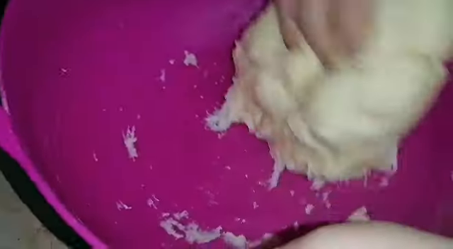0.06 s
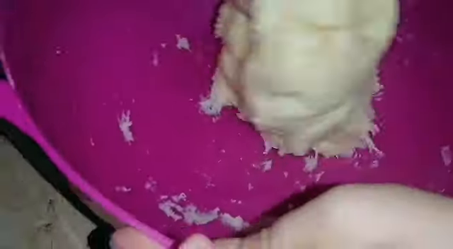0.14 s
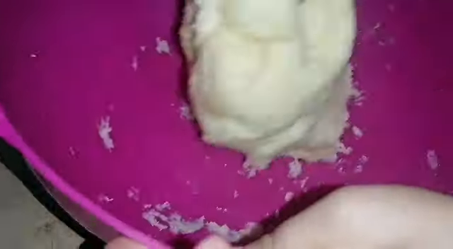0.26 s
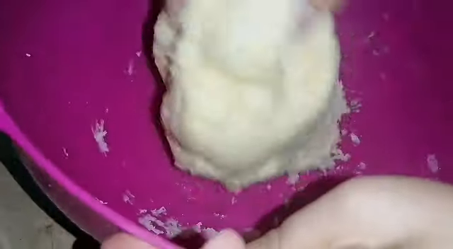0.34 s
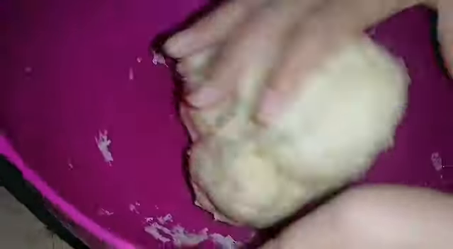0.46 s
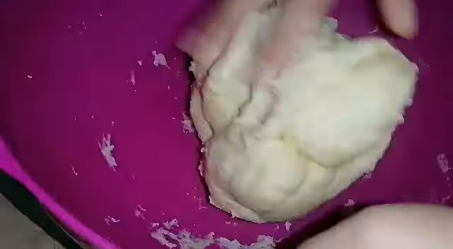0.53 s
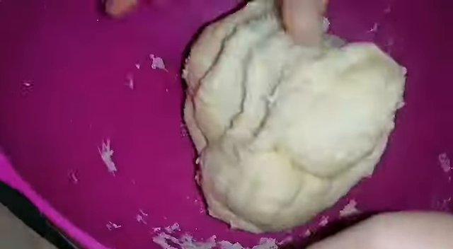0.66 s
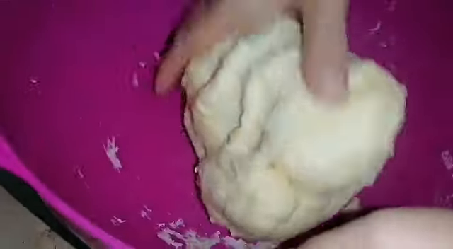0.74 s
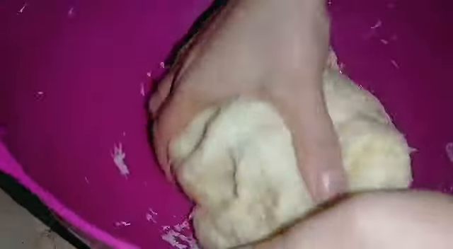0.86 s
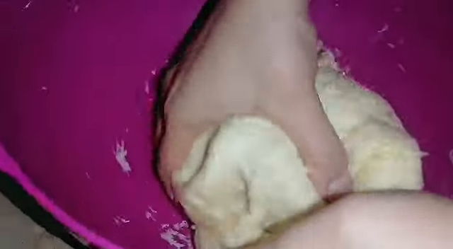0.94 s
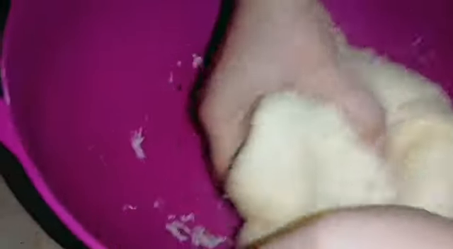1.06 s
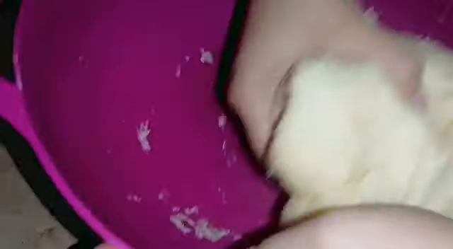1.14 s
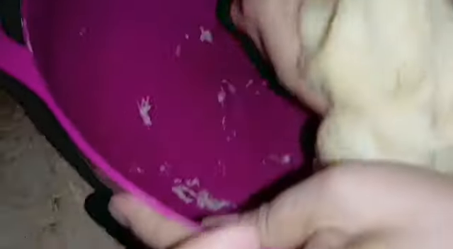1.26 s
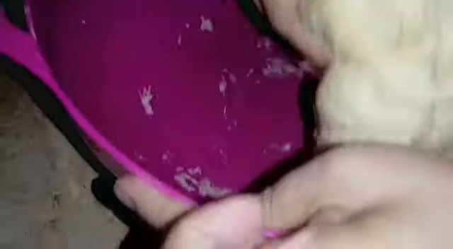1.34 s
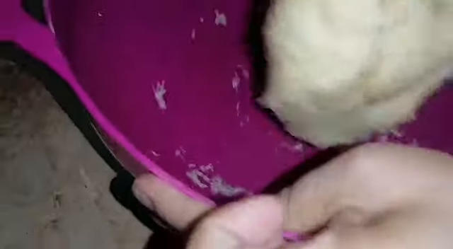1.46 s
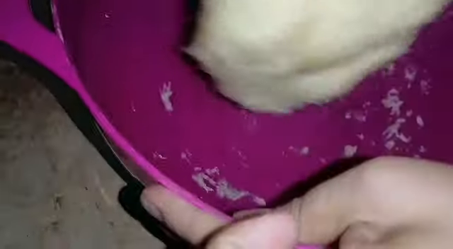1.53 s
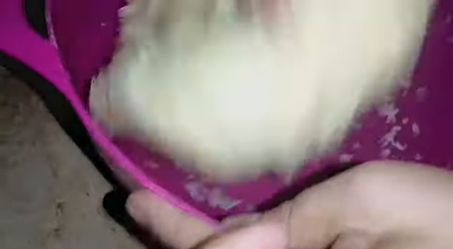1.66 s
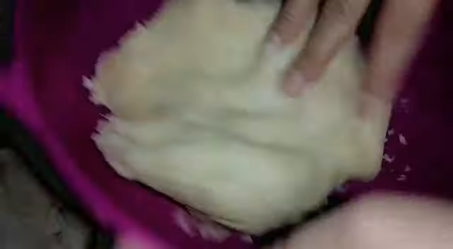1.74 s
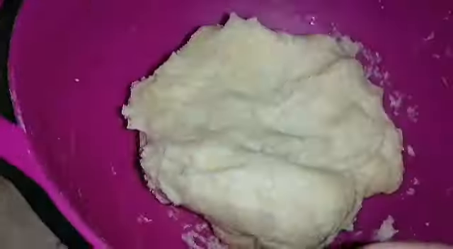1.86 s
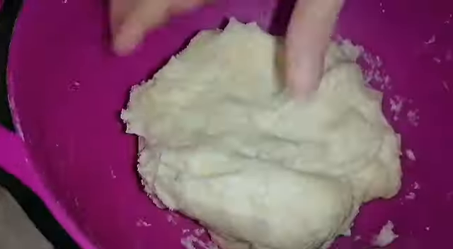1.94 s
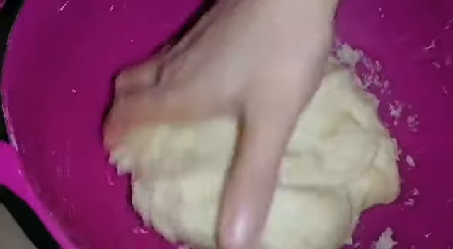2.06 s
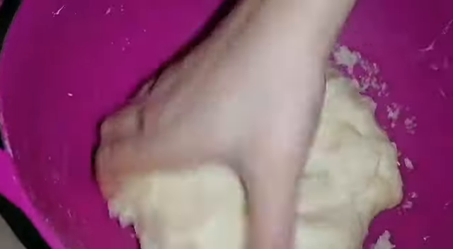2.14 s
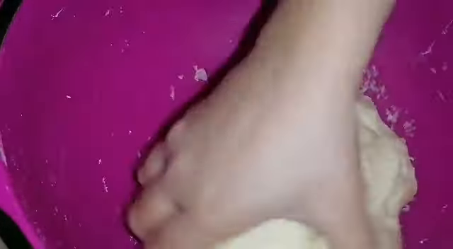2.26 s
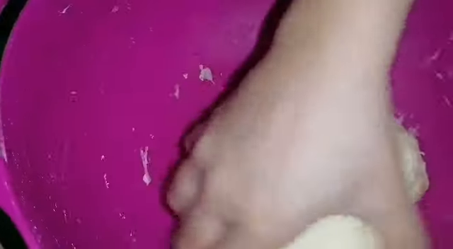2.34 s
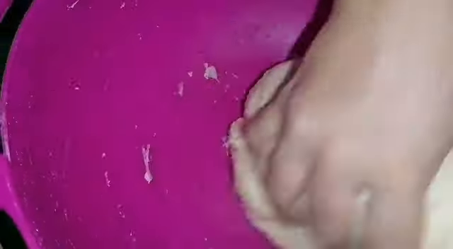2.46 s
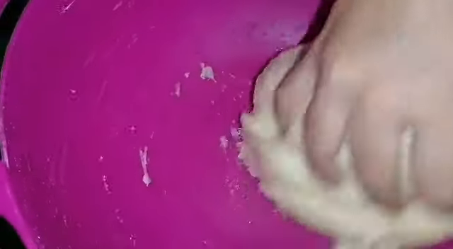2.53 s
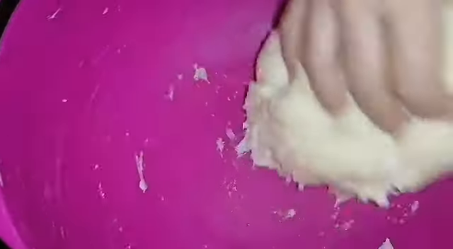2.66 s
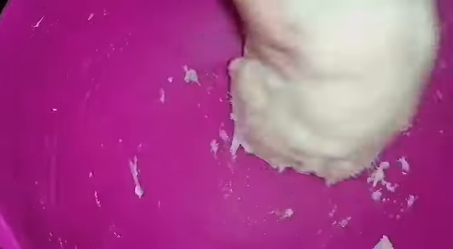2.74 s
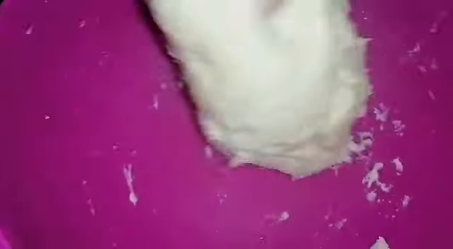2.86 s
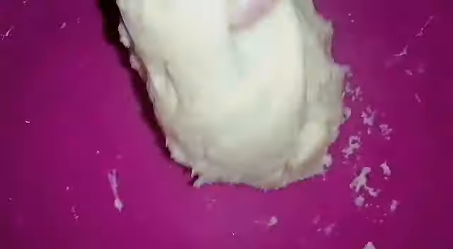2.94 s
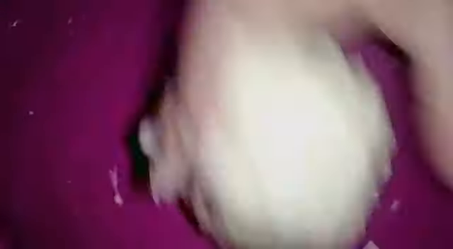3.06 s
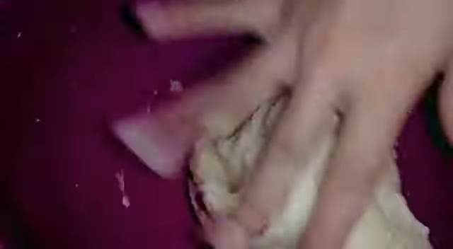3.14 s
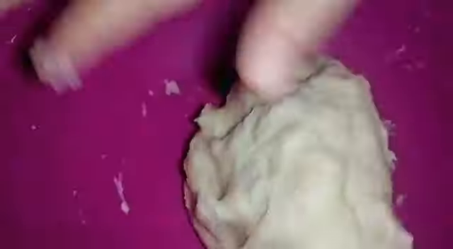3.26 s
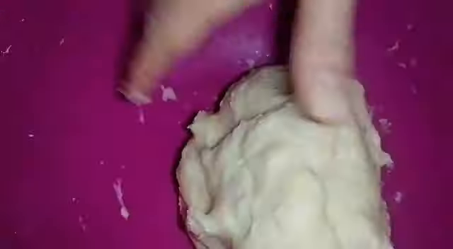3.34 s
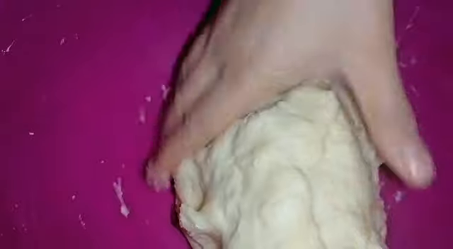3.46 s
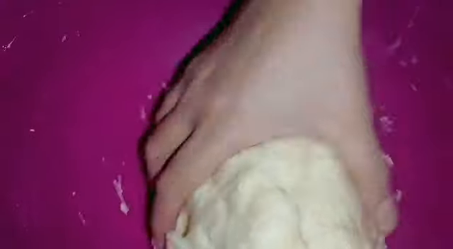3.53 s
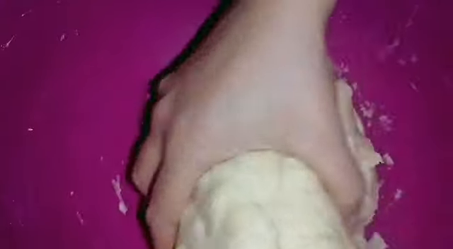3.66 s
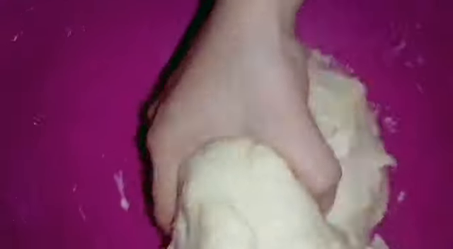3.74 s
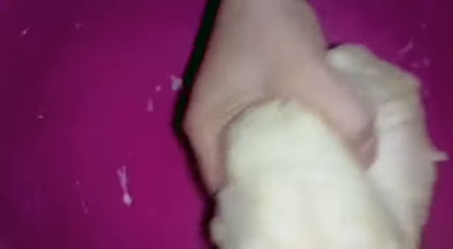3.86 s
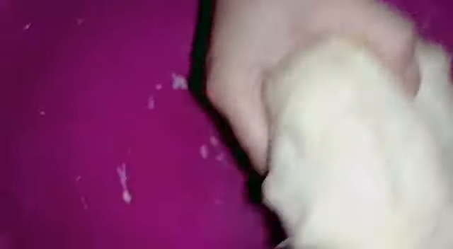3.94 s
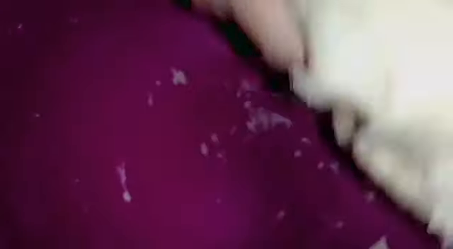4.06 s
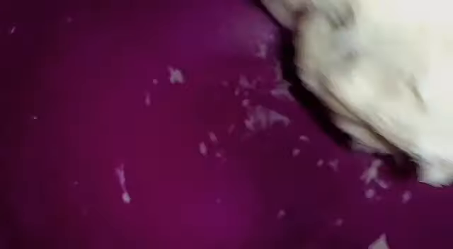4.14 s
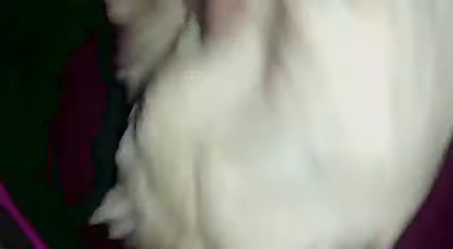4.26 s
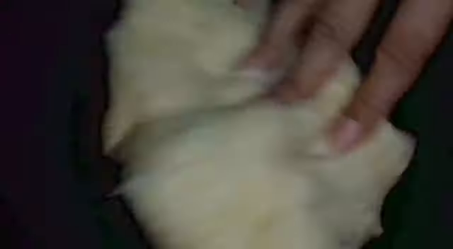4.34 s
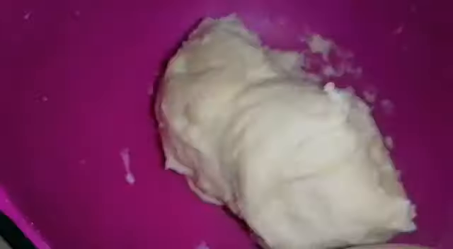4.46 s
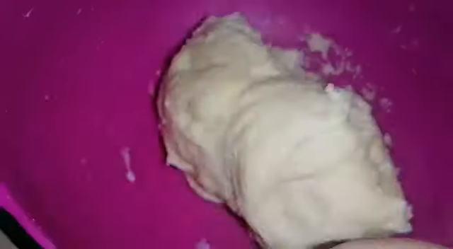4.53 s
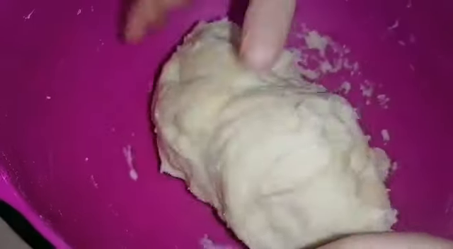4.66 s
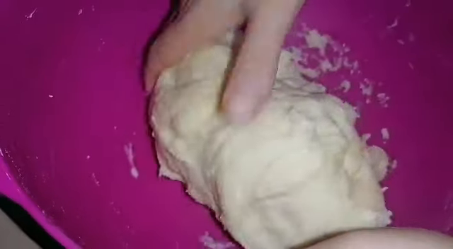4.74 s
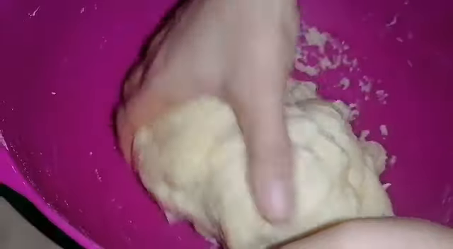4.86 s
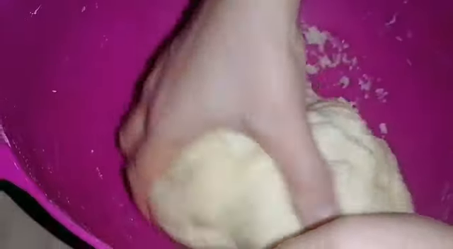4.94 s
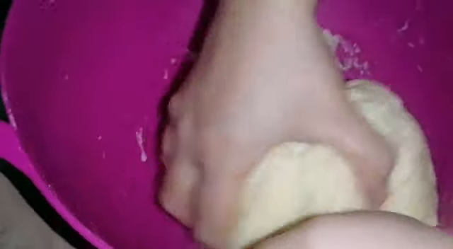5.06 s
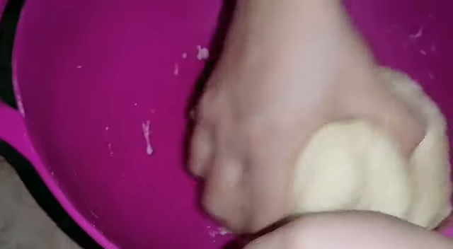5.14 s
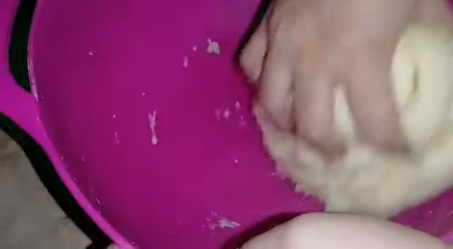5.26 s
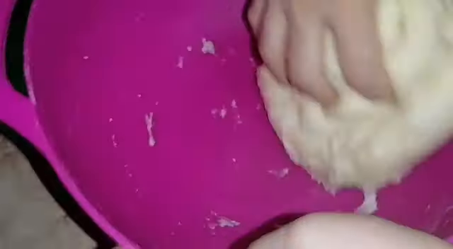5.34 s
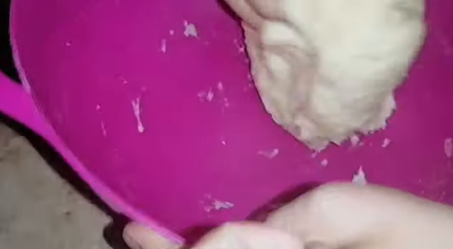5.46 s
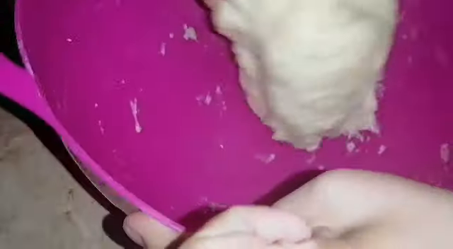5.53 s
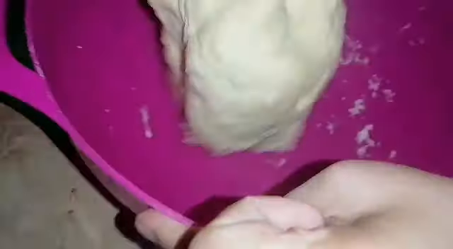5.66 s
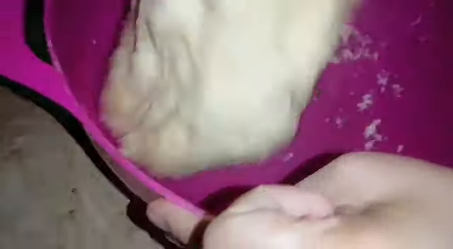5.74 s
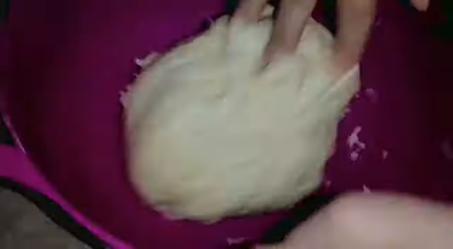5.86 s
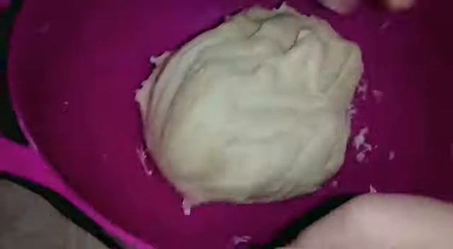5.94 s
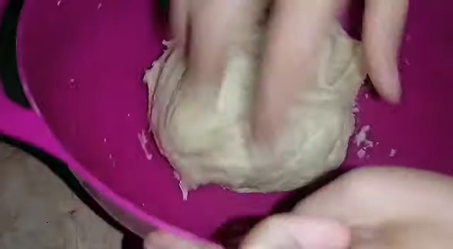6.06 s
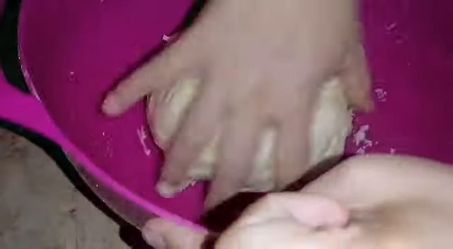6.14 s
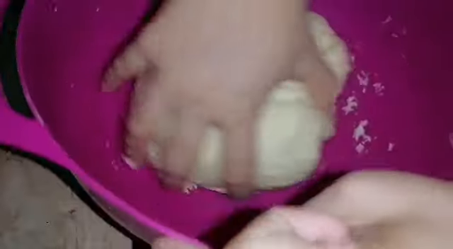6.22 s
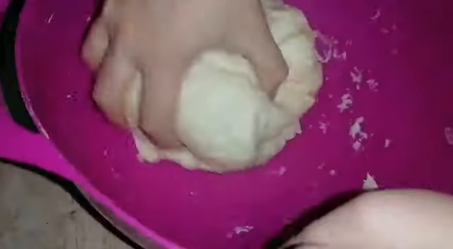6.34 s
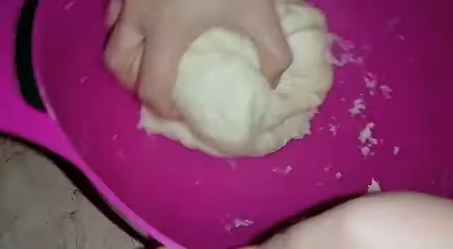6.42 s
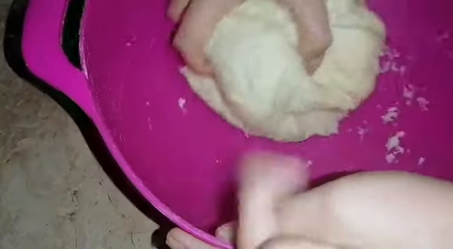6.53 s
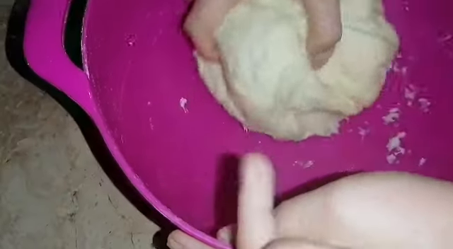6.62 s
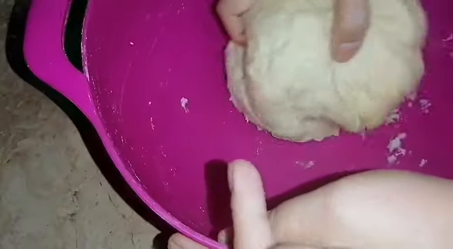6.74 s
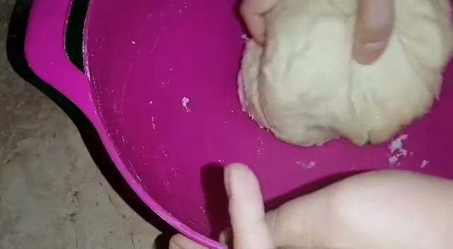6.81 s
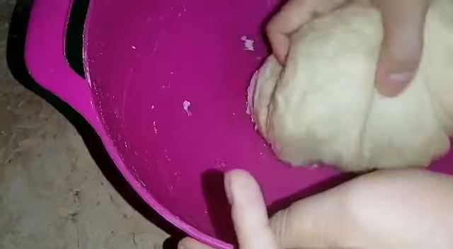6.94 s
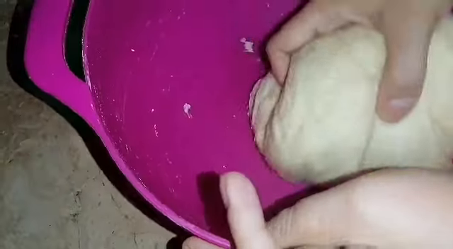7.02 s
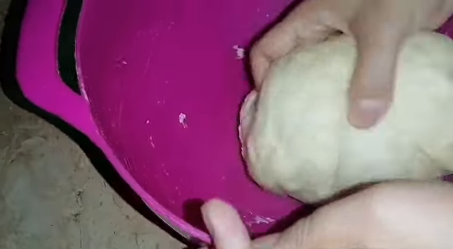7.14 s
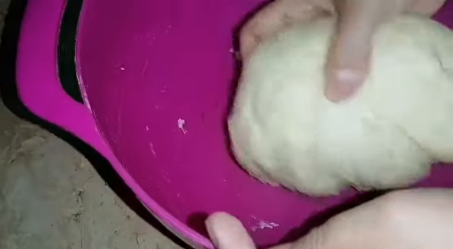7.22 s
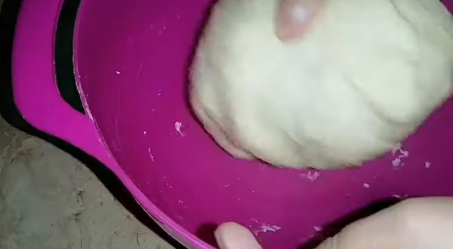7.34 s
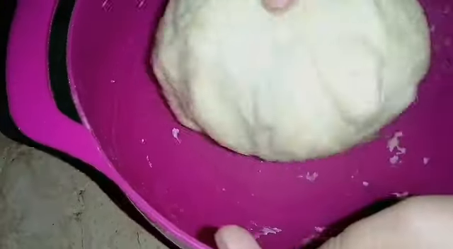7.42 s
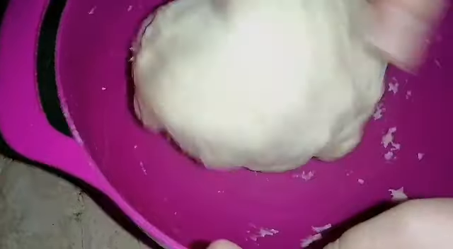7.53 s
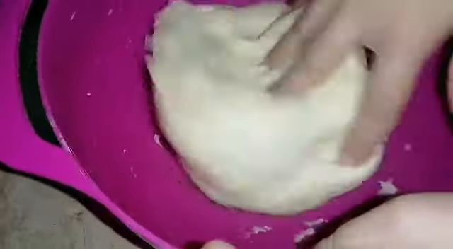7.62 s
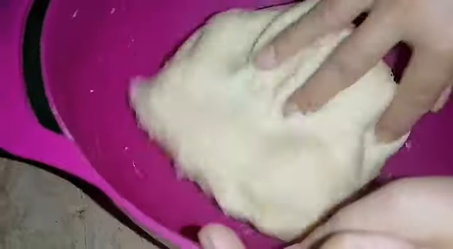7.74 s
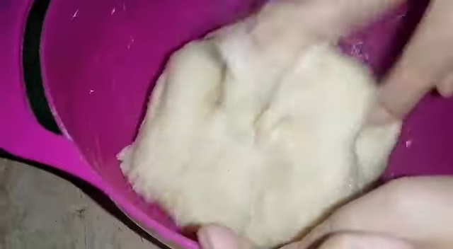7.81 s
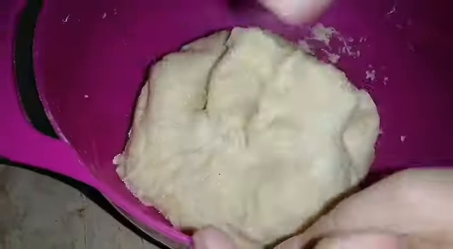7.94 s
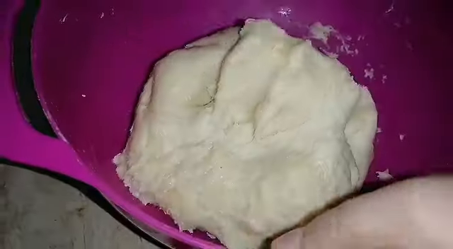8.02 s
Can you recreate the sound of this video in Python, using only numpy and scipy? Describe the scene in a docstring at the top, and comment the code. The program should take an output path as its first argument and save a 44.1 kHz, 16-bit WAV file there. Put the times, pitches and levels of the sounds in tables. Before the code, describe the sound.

Sticky dough hisses and crackles as it is folded, dropping back into a thin plastic bowl with soft slaps in a quiet kitchen.

```python
"""Soft dough rubs and peels under folding hands, and drops back into a thin plastic bowl.
Friction and snapping sticky threads make a hiss; impacts slap and set the bowl's modes booming briefly.
Trapped air pops, and a fingertip squeaks on the plastic by stick-slip. Behind them are the echo,
room tone and faint whistle of a quiet kitchen. Two spaced microphone ports are close by."""
import sys
import numpy as np
from scipy import signal
from scipy.fft import rfft, irfft, next_fast_len
from scipy.io import wavfile
from scipy.ndimage import uniform_filter1d

SR = 44100
rng = np.random.default_rng(int(sys.argv[2]) if len(sys.argv) > 2 else 0)


def to_wav(s):
    """Save 16-bit WAV."""
    ch = np.atleast_2d(s).T  # columns
    pcm = np.round(np.clip(ch, -1, 1) * 32767)  # PCM
    wavfile.write(sys.argv[1], SR, pcm.astype(np.int16))


N = 356328

# strokes of rubbing and peeling: start_s, length_s, bright_db, swell_db, dull_over_bright_db
STROKES = [(0.0, 0.12, -51.5, 3, -7.5), (0.154, 0.06, -47.5, 0, -0.5), (0.241, 0.057, -57, -2.5, -1),
           (0.348, 0.13, -62, -5, 6), (0.564, 0.038, -54.5, -9, 5.5), (0.824, 0.098, -54.5, 1.5, 2.5),
           (0.887, 0.23, -63, 13.5, 1), (1.181, 0.21, -51.5, -0.5, -0.5), (1.415, 0.11, -62.5, 0, 2),
           (1.553, 0.072, -53, -5, 0.5), (1.776, 0.054, -49.5, 3, -3), (1.879, 0.068, -48, -9.5, 3.5),
           (2.199, 0.16, -54.5, -5, -3.5), (2.423, 0.3, -58, -3.5, -6), (2.81, 0.075, -67, -4, -12),
           (2.975, 0.11, -60, -5.5, 5), (3.161, 0.032, -63, 9.5, 2.5), (3.554, 0.051, -78.5, 10.5, 7),
           (3.698, 0.45, -62, -7.5, 2), (3.855, 0.25, -71.5, 7, -9), (4.286, 0.071, -66.5, 9.5, 2.5),
           (4.461, 0.084, -56, -2.5, -10), (4.866, 0.12, -74.5, -2, 5), (5.037, 0.11, -58.5, -5, -3),
           (5.149, 0.26, -53.5, -14, -3.5), (5.47, 0.017, -69, 2.5, 2), (5.68, 0.037, -63, -6, 5.5),
           (5.769, 0.048, -58.5, 1, 3), (5.9, 0.053, -53, 1.5, -3.5), (5.988, 0.11, -53, 1, -3.5),
           (6.3, 0.072, -54.5, 3, 1.5), (6.4, 0.1, -53.5, 4.5, -9), (6.521, 0.14, -44, -3.5, -4),
           (6.85, 0.21, -76, 10.5, -3), (7.181, 0.043, -54, 3.5, 1.5), (7.329, 0.023, -64, 3, 2),
           (7.603, .15, -66, 10, 1.5), (8.01, 0.038, -62.5, -7, 4)]
GRIP_DB_PER_S, LET_GO_DB_PER_S = 359, 273
RESTING_BRIGHT_DB, RESTING_DULL_DB = -76, -73   # hands lying on the dough between strokes
CRACKLE_PER_S, CRACKLE_DB = 250, -9   # sticky threads snapping, against the friction noise
# spectra of the bright and the dull hiss: frequency_hz, density_db
BRIGHT_SPECTRUM = [(2060, -77), (3500, -13.5), (3870, -7), (4430, -5.5), (6990, 3), (8420, -6), (9960, -15),
                   (11400, -21.5), (13900, -28), (14300, -26), (15000, -19.5), (15500, -82)]
DULL_SPECTRUM = [(350, -51), (600, -54), (766, -5), (899, -2), (1250, -3.5), (1650, 0.5), (2000, 4),
                 (3200, 3), (3750, -7), (4500, -7), (5850, -4.5), (9900, -120)]
# gain of the topmost treble of the bright hiss: time_s, gain_db
SIZZLE = [(0.0, 6.5), (0.2, 6.5), (0.8, 10), (0.95, -3), (1.28, 8.5), (1.86, 0), (2.2, -4), (2.54, 17),
          (2.9, 13.5), (3.2, -4.5), (3.9, 7), (4.5, -2.5), (5.2, -4.5), (5.9, 8), (6.1, -2.5), (6.4, -24),
          (6.64, 2.5), (7.2, 5), (7.74, -9), (8.08, -3)]
SIZZLE_FROM_HZ, SIZZLE_FLICKER_DB = 10000, 1.8
# upper wall modes that rubbing excites: frequency_hz
RUBBED_MODES_HZ = [874, 1113, 1490, 1682, 2004, 2283, 2600, 2862, 3290]

# dough or fingers strike the bowl:
# start_s, bright_slap_db, dull_slap_db, low_modes_db, middle_modes_db, hollow_ring_db, lean_left_db
BLOWS = [(0.098, -29.5, -43, -80, -64, -69, 0), (0.54, -33, -34.5, -40.5, -54, -55, -7),
         (0.809, -30, -34.5, -50, -58, -55, 12), (0.825, -30.5, -37.5, -57, -62, -48, 10),
         (0.9065, -24.5, -21.5, -31, -36, -26.5, 11.5), (1.8571, -34, -30, -70, -37.5, -41.5, 8),
         (1.8653, -25.5, -31, -34.5, -44.5, -31.5, 8.5), (1.8705, -25, -29, -75, -44, -48, 0),
         (1.9524, -76, -53, -45.5, -46.5, -49, 3), (2.143, -54, -48, -54, -56, -62, 2),
         (2.562, -42, -67, -67, -61, -70, -9), (3.19, -47, -52, -56, -70, -65, 6),
         (3.2035, -50, -43, -65, -64, -57, 8), (3.2063, -41.5, -32.5, -36.5, -32.5, -25, 9),
         (4.4768, -68, -54, -46, -80, -55, 28), (4.5114, -21, -26.5, -40.5, -46.5, -31, 12.5),
         (4.839, -55.5, -57.5, -60.5, -72, -63, 10), (5.022, -54, -50, -83, -78, -77, 0),
         (5.662, -37, -31.5, -39.5, -41, -42, 9), (5.9203, -38, -41.5, -57, -51, -64, -2),
         (5.9997, -59, -39, -74, -48.5, -44, 7), (6.0082, -53, -62, -45, -66, -44.5, 18),
         (6.271, -63, -49, -72, -73, -59, 1), (6.33, -47, -38.5, -46.5, -46, -61, 2),
         (6.336, -44, -44, -56.5, -41.5, -42, -1), (6.354, -56, -63, -48.5, -52, -46, 8),
         (7.9779, -36.5, -27, -36, -34, -32, 5), (7.9882, -51, -40, -38, -49, -34.5, 17)]
TAIL_S, TAIL_AT_DB, TAIL_SHORTENING = 0.0088, -45.5, 0.35   # decay time at that level; dB lost per dB
CRACK_GAIN, CRACK_S = 0.78, 0.00095
# normal modes of the bowl: frequency_hz, level_db, t60_s
BOWL_MODES = [(53.5, 0, 0.16), (100, 3, 0.15), (143.3, 9.5, 0.34), (197.3, 3.5, 0.098), (221.5, 2.5, 0.24),
              (293, 5.5, 0.063), (373, 4, 0.032), (398.2, -1.5, 0.12), (552.2, -14.5, 0.19),
              (600, -1.5, 0.017), (586.4, -11.5, 0.15), (659, -24.5, 0.18), (848, -16.5, 0.045),
              (960, -9, 0.019)]
MIDDLE_FROM_HZ, HOLLOW_FROM_HZ = 260, 440
THUMP_BELOW_HZ, THUMP_DB = 170, -11.5   # blows drive the low modes less than handling does
DEEP_BELOW_HZ, DEEP_DB = 120, 9   # the deepest modes regain most of that
# murmur of the wall under the hands: time_s, level_db
MURMUR = [(0.0, -52.5), (0.18, -59.5), (0.26, -55.5), (0.5, -52), (0.72, -52.5), (0.895, -46), (0.93, -45),
          (1.25, -59), (2.0, -52.5), (2.6, -55.5), (3.6, -56.5), (4.5, -54.5), (4.8, -65.5), (5.9, -61.5),
          (6.4, -60.5), (6.57, -62), (6.65, -57.5), (8.08, -61)]

# air pockets burst: start_s, level_db, pitch_hz, t60_s, rasp_fraction
POPS = [(0.004, -49, 853, 0.2, 0), (0.025, -39, 540, 0.11, 0.49), (0.085, -51.5, 910, 0.19, 0.26),
        (1.822, -31.5, 936, 0.041, 0.4), (2.602, -37.5, 547, 0.023, 0.24), (2.65, -44, 874, 0.041, 0.06),
        (3.189, -43, 950, 0.034, 0.5), (3.674, -49.5, 1015, 0.29, 0.61), (4.137, -50, 904, 0.18, 1),
        (4.163, -44, 887, 0.076, 0.6), (4.478, -33, 591, 0.11, 0.3), (4.488, -23, 844, 0.044, 0.36),
        (6.645, -32.5, 930, 0.056, 0.4)]
# a fingertip slides on the plastic: middle_s, nominal_pitch_hz, level_db, tone_to_flutter_ratio
SQUEAKS = [(7.088, 1318, -61, 1.46), (7.306, 1297, -60.5, 0.66)]
# overtones of the squeak: pitch_ratio, level_db
SQUEAK_OVERTONES = [(2, -17)]
SQUEAK_FADE_DB_PER_S, SQUEAK_SAG_HZ_PER_S = 117, 320   # either side of the middle

KITCHEN_T60_S, KITCHEN_DB, WALL_CUT_HZ = 0.35, -16, 4200
# swells of a thin whistle in the room: middle_s, level_db
WHISTLES = [(3.35, -79), (3.5, -79), (6.2, -75), (7.415, -69), (7.85, -72)]
WHISTLE_HZ, WHISTLE_T60_S, WHISTLE_FADE_DB_PER_S = 4110, 0.014, 200
# spectrum of the room tone: frequency_hz, density_db
ROOM_SPECTRUM = [(12, -31), (20, 27), (64, -18), (140, 4.5), (393, 2), (519, -14), (881, -2.5), (3080, -27),
                 (4430, -14.5), (7110, -73), (10200, -24), (12100, -137), (15500, -81)]
ROOM_TONE_DB = -61.5

# likeness of the sound at the two ports: frequency_hz, correlation_ratio
COHERENCE = [(60, 0.84), (200, 0.99), (400, 0.29), (800, 0.03), (1300, 0.0016)]
# the microphone turns: time_s, left_over_right_db
BALANCE = [(0.0, 0), (4.4, -0.5), (4.7, -6), (5.9, -3.5), (6.3, -7), (8.08, -11)]
PORT_HZ, PORT_T60_S, PORT_DB, PORT_LAG_S = 7080, .008, -30, .0004
DUCK_BELOW_HZ, DUCK_WINDOW_S = 1400, .04
DUCK_FROM_DB, DUCK_SLOPE = 8.5, 3.4   # threshold of treble over bass; dB taken for each dB more
BASS_CUT_HZ, TREBLE_CUT_HZ = 224, 15900


def rubbing():
    """Sliding friction radiates a bright and a dull hiss, which flicker as the contact patch changes."""
    bright_gain, dull_gain = stroke_envelopes()
    grip_db = 1.28 * drift(13.8) + 1.3 * drift(45)
    fine = sticky_friction(np.geomspace(4300, 9500, 13), t60_cycles=70, patchy_db=4, ring_db=-4)
    bright = colour(fine, BRIGHT_SPECTRUM)
    body = signal.sosfilt(signal.butter(4, SIZZLE_FROM_HZ, "low", fs=SR, output="sos"), bright)
    top = signal.sosfilt(signal.butter(4, SIZZLE_FROM_HZ, "high", fs=SR, output="sos"), bright)
    top *= from_db(in_time(SIZZLE) + SIZZLE_FLICKER_DB * drift(47))
    bright = (body + top) * bright_gain * from_db(grip_db + 0.29 * drift(49))
    coarse = sticky_friction(RUBBED_MODES_HZ, t60_cycles=25, patchy_db=6.2, ring_db=-5.5)
    dull = colour(coarse, DULL_SPECTRUM) * dull_gain
    return bright + dull * from_db(grip_db + 0.87 * drift(6.4) + 0.95 * drift(60))


def stroke_envelopes():
    """Incoherent sources add in power: bright and dull gains as strokes grip, swell or sink, and let go."""
    t = np.arange(0, N + 64, 64) / SR
    power = np.ones((2, len(t))) * from_db([[2 * RESTING_BRIGHT_DB], [2 * RESTING_DULL_DB]])
    for start_s, length_s, bright_db, swell_db, dull_db in STROKES:
        age = t - start_s
        db = bright_db + swell_db * np.clip(age / length_s, 0, 1)
        db -= GRIP_DB_PER_S * np.maximum(-age, 0) + LET_GO_DB_PER_S * np.maximum(age - length_s, 0)
        power += from_db(2 * (db + np.array([[0], [dull_db]])))
    return [np.interp(np.arange(N) / SR, t, np.sqrt(p)) for p in power]


def sticky_friction(rings_hz, t60_cycles, patchy_db, ring_db):
    """Adhesion adds to friction noise: pockets resonate as they open and close, and threads snap."""
    hiss, drive = rng.standard_normal((2, 2, N))
    rings = sum(ring(drive * from_db(patchy_db * drift(8.1)), hz, t60_cycles / hz) * hz
                for hz in rings_hz)
    sizes = from_db(3.5 * np.minimum(rng.exponential(1, N), 3))
    snaps = (rng.random(N) < CRACKLE_PER_S / SR) * sizes * hiss
    return hiss + from_db(ring_db) * rms_one(rings) + from_db(CRACKLE_DB) * rms_one(snaps)


def slaps():
    """An impact radiates a broadband transient: a crack, then a wet tail that harder blows shorten."""
    white = rng.standard_normal((2, 2, N))
    bright, dull = colour(white[0], BRIGHT_SPECTRUM), colour(white[1], DULL_SPECTRUM)
    out = np.zeros((2, N))
    for start_s, bright_db, dull_db, *_ in BLOWS:
        at = round(start_s * SR)
        t = np.arange(min(SR // 8, N - at)) / SR
        span = slice(at, at + len(t))
        tail_s = TAIL_S * from_db(-TAIL_SHORTENING * (bright_db - TAIL_AT_DB))
        crack = CRACK_GAIN * TAIL_S / tail_s * np.exp(-t / CRACK_S) * (1 - np.exp(-t / 0.0009))
        tail = np.exp(-t / tail_s) * (1 - np.exp(-t / 0.0041))
        envelope = crack + tail
        spray = envelope * bright[:, span]
        out[:, span] += from_db(bright_db) * spray / np.abs(spray).max()
        out[:, span] += from_db(dull_db) * rms_one(envelope * dull[:, span]) * np.sqrt(np.mean(envelope ** 2))
    return out


def bowl():
    """The wall's normal modes boom in free decay after blows and murmur in forced vibration when handled."""
    start_s, _, _, low_db, middle_db, hollow_db, lean_db = np.transpose(BLOWS)
    far_port = np.array([lean_db < 0, lean_db >= 0])
    arrivals = np.round(start_s * SR).astype(int) + round(PORT_LAG_S * SR) * far_port
    handling = rng.standard_normal((2, N))
    booms, murmur = 0, 0
    for k, (hz, level_db, t60) in enumerate(BOWL_MODES):
        upper, hollow = hz > MIDDLE_FROM_HZ, hz > HOLLOW_FROM_HZ
        blow_db = hollow_db if hollow else middle_db if upper else low_db
        bass_db = THUMP_DB * (hz < THUMP_BELOW_HZ) + DEEP_DB * (hz < DEEP_BELOW_HZ)
        scatter_db = 2.5 * rng.standard_normal(len(start_s))
        lean = pan(lean_db * (1 if upper else 0.29))   # upper modes radiate more unevenly
        polarity = 1 if hollow else (-1) ** k   # lower modes start against each other
        impulses = np.zeros((2, N))
        impulses[[[0], [1]], arrivals] = polarity * lean * from_db(blow_db + bass_db + level_db + scatter_db)
        booms += ring(impulses, hz, t60)
        drive = ports(*handling, hz) * from_db(0.89 * level_db + 1.0 * upper)
        murmur += ring(drive, hz, 0.45 * t60)
    booms = signal.lfilter(*signal.butter(1, 1200, fs=SR), booms)   # dough makes a slow, soft contact
    return booms + from_db(in_time(MURMUR) + 3.87 * drift(3.7)) * rms_one(murmur)


def pops():
    """A bursting air pocket is a damped resonator; a ragged tear roughens it and adds an overtone."""
    out, tone_flutter, overtone_flutter = np.zeros(N), drift(260), drift(105)
    for start_s, level_db, hz, t60, rasp in POPS:
        at = round(start_s * SR)
        t = np.arange(int(t60 * SR)) / SR
        span, phase = slice(at, at + len(t)), 2 * np.pi * hz * t
        tone = (1 - rasp + rasp * tone_flutter[span]) * np.sin(phase)
        overtone = 0.5 * rasp * overtone_flutter[span] * np.sin(1.85 * phase)
        envelope = from_db(level_db - 60 * t / t60) * (1 - np.exp(-t / 0.0018))
        out[span] += envelope * (tone + overtone)
    return out * from_db([[4], [-5]])


def squeaks():
    """Uneven stick-slip of a fingertip gives a fluttering tone, highest and loudest in mid-slide."""
    t, out = np.arange(N) / SR, 0
    partials = [(ratio, db, drift(45), drift(37)) for ratio, db in [(0.98, 0)] + SQUEAK_OVERTONES]
    for middle_s, hz, level_db, steady in SQUEAKS:
        away_s = np.abs(t - middle_s)
        phase = 2 * np.pi * np.cumsum(hz - SQUEAK_SAG_HZ_PER_S * np.minimum(away_s, .5)) / SR
        envelope = from_db(level_db - SQUEAK_FADE_DB_PER_S * away_s)
        for ratio, db, in_phase, quadrature in partials:
            tone = (steady + in_phase) * np.sin(ratio * phase) + quadrature * np.cos(ratio * phase)
            out += envelope * from_db(db) * tone
    return out * from_db([[-1.5], [1.5]])


def kitchen_echo(x):
    """Reverberation by repeated reflection: four feedback delays a side, duller on every round trip."""
    out, pole = np.zeros((2, N)), np.exp(-2 * np.pi * WALL_CUT_HZ / SR)
    for k, lag in enumerate((rng.uniform(0.02, 0.061, 8) * SR).astype(int)):
        loop, gain, state = x.copy(), from_db(-60 * lag / SR / KITCHEN_T60_S), [0.]
        for i in range(lag, N, lag):
            reflection, state = signal.lfilter([gain * (1 - pole)], [1, -pole], loop[i - lag:i], zi=state)
            loop[i:i + lag] += reflection[:N - i]
        out[k % 2] += (loop - x) * (-1) ** (k // 2)
    return out


def whistle():
    """A narrow resonance, applied twice, filters noise to a thin tone that swells now and then."""
    t = np.arange(N) / SR
    swells_db = [db - WHISTLE_FADE_DB_PER_S * np.abs(t - middle_s) for middle_s, db in WHISTLES]
    band = ring(rng.standard_normal((2, N)), WHISTLE_HZ, WHISTLE_T60_S)
    return rms_one(ring(band, WHISTLE_HZ, WHISTLE_T60_S)) * from_db(np.max(swells_db, axis=0))


def room_tone():
    """Stationary noise, strongest in the bass, is the kitchen's background."""
    return from_db(ROOM_TONE_DB) * colour(rng.standard_normal((2, N)), ROOM_SPECTRUM)


def ports(mid, side, hz):
    """Spatial coherence falls with frequency: the left and right ports agree in the bass only."""
    alike = at_hz(COHERENCE, hz)
    return (np.sqrt(1 + alike) * mid + np.sqrt(1 - alike) * side * [[1], [-1]]) / np.sqrt(2)


def colour(pair, spectrum):
    """Spectral shaping turns two independent noises into a partly coherent stereo pair of rms 1."""
    size = next_fast_len(N)
    hz = np.maximum(np.fft.rfftfreq(size, 1 / SR), 10)
    mid, side = rfft(pair, size) * from_db(at_hz(spectrum, hz))
    return rms_one(irfft(ports(mid, side, hz), size)[:, :N])


def ring(x, hz, t60):
    """A damped harmonic oscillator: a unit impulse starts a decaying sine of amplitude 1."""
    r, w = from_db(-60 / (t60 * SR)), 2 * np.pi * hz / SR
    return signal.lfilter([0, np.sin(w)], [1, -2 * r * np.cos(w), r * r], x + 1e-18)


def drift(rate_hz):
    """Low-passed noise gives a slow random fluctuation of rms 1."""
    r = np.exp(-80 * np.pi * rate_hz / SR)   # one step every 40 samples
    slow = signal.lfilter([1], [1, -2 * r, r * r], rng.standard_normal(N // 40 + 2002))[2000:]
    return np.interp(np.arange(N) / 40, np.arange(len(slow)), rms_one(slow))


def pan(left_over_right_db):
    """A level difference, split evenly into left and right gains."""
    return from_db(np.outer([.5, -.5], left_over_right_db))


def from_db(db):
    """Decibels to amplitude ratio."""
    return 10 ** (np.asarray(db) / 20)


def rms_one(x):
    """Normalisation to rms 1."""
    return x / np.sqrt(np.mean(x ** 2) + 1e-20)


def in_time(curve):
    """Linear interpolation of a curve, one value a sample."""
    return np.interp(np.arange(N) / SR, *np.transpose(curve))


def at_hz(spectrum, hz):
    """Interpolation on a log-frequency axis."""
    points_hz, values = np.transpose(spectrum)
    return np.interp(np.log(hz), np.log(points_hz), values)


def scene():
    """Superposition of dough, bowl and kitchen; the balance shifts as the microphone turns."""
    hits = slaps() + bowl() + pops()
    background = room_tone()
    whole = rubbing() + hits + squeaks() + whistle() + background
    return (whole + from_db(KITCHEN_DB) * kitchen_echo(hits[0])) * pan(in_time(BALANCE))


def record(dry):
    """The ports resonate, a suppressor ducks the bass under strong treble, and filters limit the band."""
    heard = dry + from_db(PORT_DB) * ring(dry, PORT_HZ, PORT_T60_S)
    bass = signal.sosfiltfilt(signal.butter(3, DUCK_BELOW_HZ, fs=SR, output="sos"), heard)
    treble = heard - bass
    power = uniform_filter1d(np.square([bass, treble]).mean(axis=1), int(DUCK_WINDOW_S * SR))
    bass_db, treble_db = 10 * np.log10(power + 1e-12)
    excess_db = np.maximum(treble_db - bass_db - DUCK_FROM_DB, 0)
    heard = treble + bass * from_db(-DUCK_SLOPE * excess_db)
    heard = signal.lfilter(*signal.butter(1, BASS_CUT_HZ, "high", fs=SR), heard)
    return signal.sosfilt(signal.cheby2(12, 60, TREBLE_CUT_HZ, fs=SR, output="sos"), heard)


dry = scene()
out = record(dry)
to_wav(out)
```